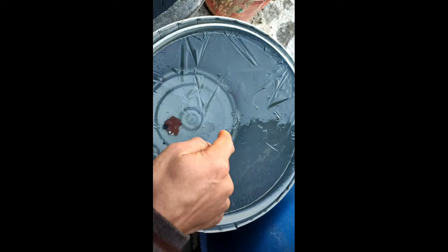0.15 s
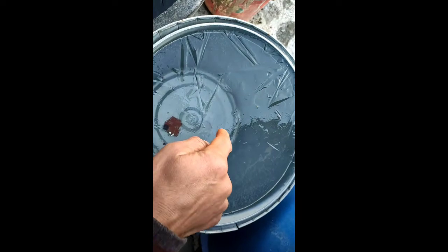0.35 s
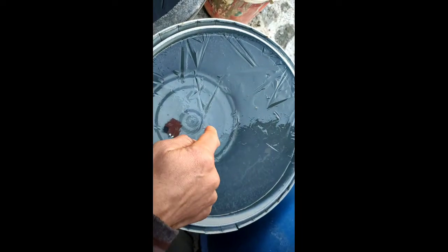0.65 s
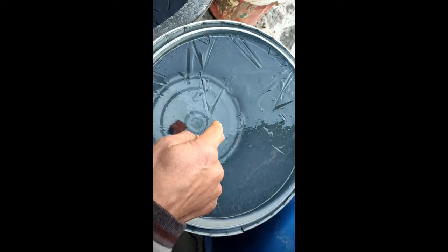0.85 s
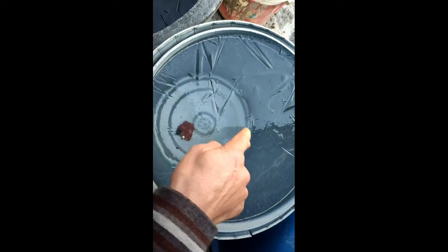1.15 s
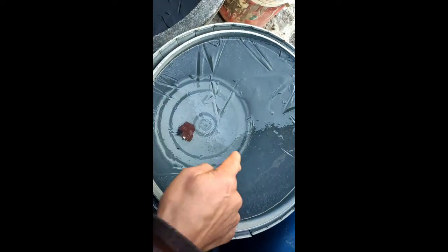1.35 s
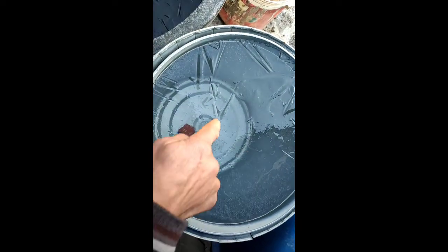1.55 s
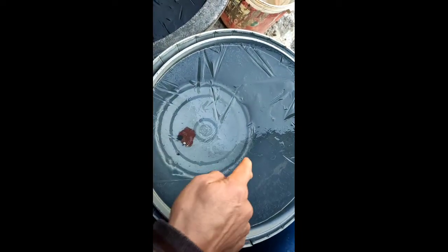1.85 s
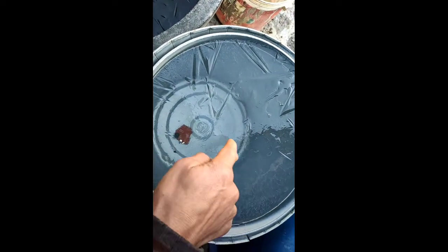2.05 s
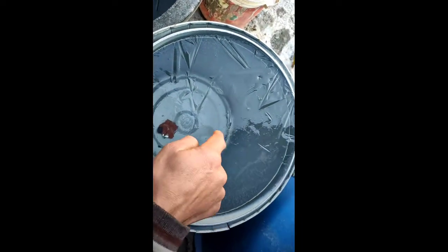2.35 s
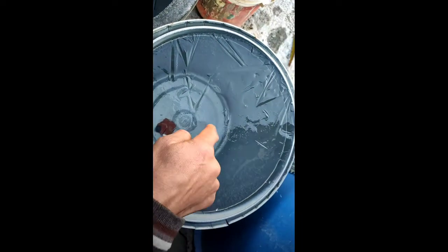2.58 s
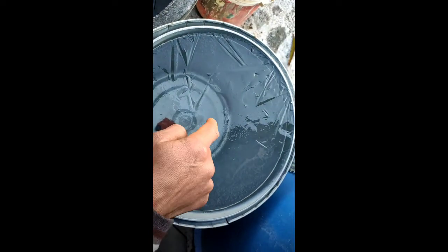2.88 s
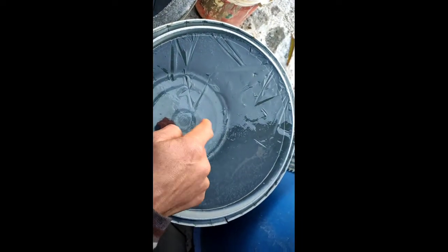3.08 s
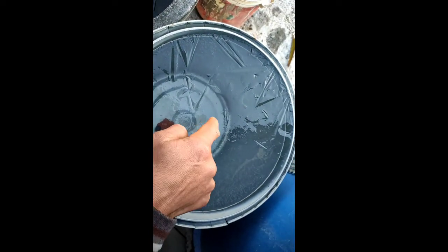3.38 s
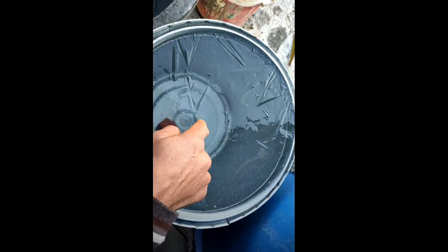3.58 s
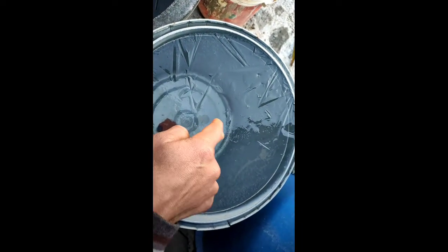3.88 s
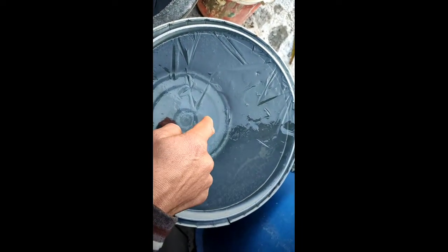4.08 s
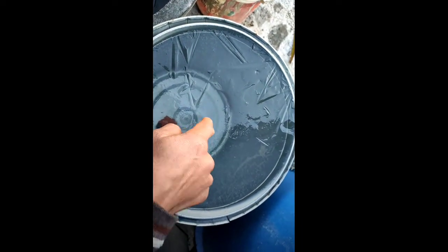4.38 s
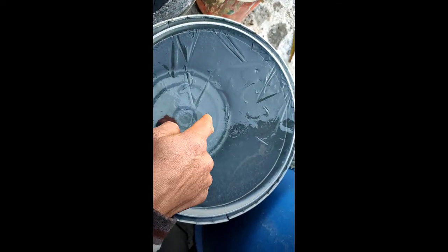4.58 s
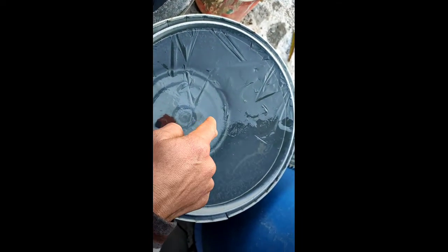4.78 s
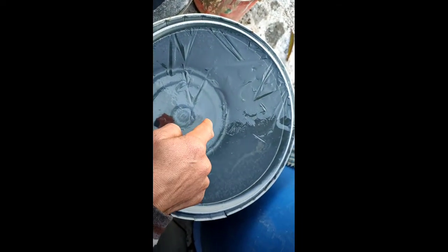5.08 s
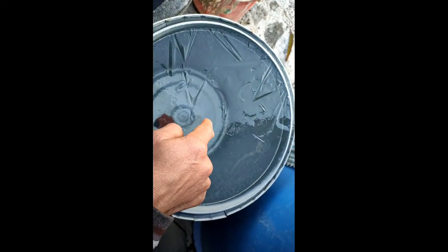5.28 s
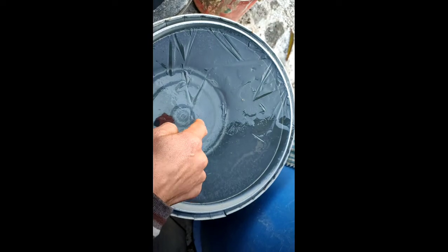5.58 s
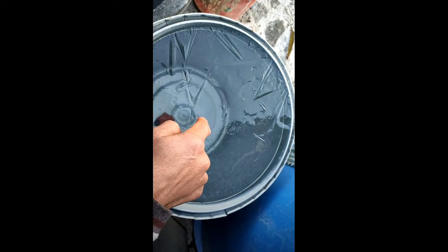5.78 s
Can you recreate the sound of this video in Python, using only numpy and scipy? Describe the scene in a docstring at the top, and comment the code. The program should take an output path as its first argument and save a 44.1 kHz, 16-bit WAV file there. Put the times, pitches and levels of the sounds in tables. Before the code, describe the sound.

A fingertip taps a thin cracked ice sheet on a bucket, crisp crunches over hollow thumps, faint bird and light wind behind.

```python
"""Outdoors, close to the microphone: a fingertip taps a thin, cracked sheet of ice on a plastic bucket of water.
Each tap is a brief crunch of filtered noise over a hollow thump, a falling wave with the bucket's ringing.
Once the finger slides out and back over the ice, a hiss and murmur of noise with small snags.
A small bird gives thin, falling calls from paired whistles; low noise makes light wind on the microphone,
and fainter noise the air and a distant wash."""
import sys
import numpy as np
from scipy import signal
from scipy.fft import rfft, irfft
from scipy.io import wavfile
from scipy.ndimage import uniform_filter1d

SR = 44100
rng = np.random.default_rng(int(sys.argv[2]) if len(sys.argv) > 2 else 0)


def waveform_to_disk(signal):
    """Save audio, clipped to [-1, 1], as 16-bit WAV at the path in sys.argv[1]."""
    frames = np.transpose(np.atleast_2d(signal))
    scaled = np.clip(frames, -1, 1) * 32767
    samples = np.round(scaled).astype(np.int16)
    wavfile.write(sys.argv[1], SR, samples)


N = 261954
TIME = np.arange(N) / SR  # s

# Left-right levels are positive toward the left; spectra give relative level per Hz.
# Finger taps: [t/s, crunch level/dB, time to crunch peak/s, thump setting/dB, hollowness of the spot/dB,
# left-right level/dB, f of the peak added to the crunch's colour/Hz]
TAPS = [(0.1712, -52.5, 0.00014, -70, -9, -1, 11200), (0.2537, -44.5, 0.00032, -35, 6.5, 6, 1220),
        (0.2591, -37.5, 0.0015, -41.5, -0.5, 0, 3270), (0.5362, -49, 0.00033, -43, 6, 0, 1260),
        (0.7501, -47, 0.00096, -35, 5, 0, 2200), (0.977, -53, 0.00098, -44.5, 4.5, -0.5, 1220),
        (1.2007, -59, 0.0018, -58, 8, 6, 1670), (2.3136, -34.5, 0.00088, -26.5, 6.5, 3.5, 1200),
        (2.5592, -17.5, 0.0031, -27, 2, -2.5, 3360), (2.8161, -40.5, 0.00063, -34, 5.5, 3, 1240),
        (3.0311, -18.5, .0016, -35.5, 1.5, 2.5, 2300), (3.295, -28.5, 0.0028, -31, 3, 1, 4040),
        (3.571, -24, 0.0014, -29.5, -1, 4.5, 3070), (3.9842, -17, 0.0047, -27.5, -0.5, 3, 1720),
        (4.4568, -23, 0.0066, -29, 2, 2, 3910), (4.931, -25.5, 0.00057, -34, 3, 4.5, 3810),
        (5.189, -42, .0008, -41, 5.5, 7, 3790), (5.1913, -34, 0.00098, -34.5, 4.5, 0, 3930),
        (5.4401, -42, .0007, -35, 5, 4, 3070), (5.639, -32.5, 0.0037, -32.5, 4, 3.5, 4050),
        (5.8724, -39.5, 0.0021, -34, 5, 0, 3240)]
# Change of colour with the spot, rows boom, knock, clack, sparkle:
# [level on a solid spot/dB, slope/dB per dB of hollowness]
TOUCH = [(-1.5, 1.35), (-1.2, 1.54), (0.5, 1.15), (-0.44, -0.12)]
# Broad colour of the ice sheet: [f/Hz, level/dB]
ICE = [(150, -27.5), (400, -11), (600, -24), (850, -22), (1400, -19), (2400, -12.5), (3600, -10),
       (6400, -2), (8000, 0.5), (11000, -4.5), (15000, -11), (16500, -9.5)]
# Resonances of the sheet: [f/Hz, width/Hz, level/dB]
ICE_MODES = [(1250, 58, 5.5), (1742, 170, 4), (2195, 94, 5.7), (3212, 430, 6.8), (3685, 350, 6.6),
             (4050, 330, 3), (5460, 260, 1.1), (5970, 110, 2.2), (8000, 130, 1.7), (8450, 200, 3),
             (9330, 120, 1)]
# Balance of the ice between the microphone ports: [f/Hz, left-right level/dB]
ICE_BALANCE = [(600, 3), (2400, -2.5), (4400, -3.5), (8100, -14.5), (11000, -16.5), (15000, -3)]
# Light taps rattle on relatively longer: [crunch level/dB, splash against crunch level/dB]
SPLASH = [(-43, -12.5), (-23, -20.5)]
# A crunch that builds slowly also dies slowly: s, and s per s of rise
CRUNCH_T60, CRUNCH_T60_PER_RISE = 0.021, 1.5

# Hollow colour of the bucket and its water: [f/Hz, level/dB]
BUCKET = [(50, -18.5), (105, -4), (145, -20), (203, -5.5), (250, -11), (295, -7.5), (370, -28), (460, -17),
          (570, -30), (760, -23.5), (1100, -36.5), (3000, -76.5)]
# Clear notes of the bucket under each thump: [f/Hz, level against the thump setting/dB, t60/s]
BUCKET_MODES = [(203.9, -14.5, 0.17), (289.2, -24, 0.22)]
BUCKET_RISE_S = 0.021
# Colour of the lingering rumble: [f/Hz, level/dB]
RUMBLE_COLOUR = [(20, -28), (44, -11), (58, 5), (72, -3.5), (100, -14), (150, -30.5), (205, -25),
                 (260, -35), (500, -55.5)]
# The rumble has RUMBLE_DB at the given thump setting, and changes about half as much as the thump
RUMBLE_DB, RUMBLE_AT_THUMP_DB, RUMBLE_DB_PER_DB = -57, -34, 0.53
RUMBLE_RISE_S, RUMBLE_T60 = 0.02, 1.7  # s

# Bird calls: [t/s, length/s, starting f midway between the whistles/Hz, fall/Hz, level before fade and trim/dB]
BIRD = [(0, .16, 6960, 317, -58), (0.766, 0.21, 7460, 1050, -60.5), (1.665, 0.11, 7530, 550, -62.5),
        (2.174, 0.21, 7120, 347, -60), (4.165, 0.12, 7570, 450, -78.5), (4.727, 0.16, 7670, 900, -61.5)]
CALL_FADE_DB = -10.5  # a call weakens toward its end

# Hiss of the outdoor air: [f/Hz, level/dB]
AIR = [(76, -31), (130, -0.5), (335, -13), (402, -8.5), (664, -14), (812, -15.5), (954, -17.5), (1520, -19),
       (1930, -18), (3010, -20), (7300, -19), (16000, -21.5)]
AIR_DB = -72.2
# Colour of the distant wash: [f/Hz, level/dB]
WASH_COLOUR = [(100, -12.5), (300, -2.5), (600, -5), (1200, -7), (2200, -11.5), (5000, -14.5), (16000, -27)]
# The wash dies down to a steady level: dB, extra dB at the start, time constant of the extra dB in s
WASH_DB, WASH_EXTRA_DB, WASH_FADE_S = -80.5, 13.5, 0.61

# Colour of the wind on the microphone: [f/Hz, level/dB]
WIND_COLOUR = [(10, -0.5), (24, 3), (40, -3), (60, -15.5), (90, -21), (130, -28.5), (200, -41.5),
               (400, -64)]
# Side the wind comes from: [t/s, left-right level/dB]
WIND_SIDE = [(0, 16.5), (1.9, 13), (2.4, 10.5), (5.94, 10)]
# Gusts, before a 1 dB trim of all wind: [t/s, level/dB]
GUSTS = [(0, -41), (.72, -41.5), (.9, -44), (1.519, -39), (1.83, -42), (2.24, -54.5), (2.969, -47),
         (4.38, -42.5), (4.54, -42.5), (5.48, -43)]
BREEZE_DB, GUST_RISE_S, GUST_FALL_S = -53.5, 0.04, 0.058  # breeze before the same trim

# Strokes of the sliding finger, out and back: [start t/s, fastest t/s, end t/s, hiss level when fastest/dB]
STROKES = [(1.181, 1.435, 1.58, -49.5), (1.58, 1.946, 2.06, -50)]
SWELL_DB, SINK_DB = 43, 20.5  # rise of the hiss as a stroke speeds up, drop as it slows
CREEP_DB, SKIN_DB = -67.5, -67  # hiss and murmur of the barely moving finger
LANDING_S = 0.006  # time to touch down or lift
# Colour of the hiss of skin on ice: [f/Hz, level/dB]
SLIDE_HISS = [(350, -57), (600, -14), (1050, -13.5), (1450, -21), (2120, -13), (2540, -12.5), (3250, -9),
              (5050, -10), (8500, -9), (16000, -24.5)]
# Colour of the skin's murmur: [f/Hz, level/dB]
SLIDE_SKIN = [(100, -29), (200, 0), (300, 4), (480, -5), (700, -12), (1200, -12.5), (2500, -23)]
# The skin grips and judders: [t/s, length/s, murmur level before a 1 dB trim/dB]
JUDDERS = [(1.232, .03, -59.5), (1.273, 0.02, -59.5), (1.655, 0.053, -59), (1.802, 0.083, -55.5),
           (1.967, 0.012, -54.5)]
JUDDER_HISS_DB = -6.5  # hiss of a judder against its murmur

# The sliding finger snags on ridges: [t/s, level/dB, left-right level/dB]
SNAGS = [(1.2831, -55, -1), (1.4072, -42, -18), (1.418, -42.5, 3), (1.4237, -49, -13), (1.446, -47, 2),
         (1.487, -47.5, 0), (1.8462, -52.5, 0)]
SNAG_RISE_S, SNAG_PEAK_HZ = 0.00054, 3290
# Colour of a hard snag: [boom/dB, knock/dB, clack/dB, sparkle/dB]
SNAG_TOUCH_DB = (16.5, 14, 9, -9.5)

# The ice ticks as the finger lets go of it: [t/s, level/dB]
RELEASES = [(2.353, -57), (3.617, -58.5), (4.0324, -43.5), (4.5047, -46), (4.969, -66.5), (5.686, -58)]
RELEASE_RISE_S, RELEASE_PEAK_HZ, RELEASE_PAN_DB = 0.00085, 3270, 5
# Colour of a release: [boom/dB, knock/dB, clack/dB, sparkle/dB]
RELEASE_TOUCH_DB = (1, 1, 1, -2)

EDGE_HZ = 15900  # upper edge of the recorder's band


def gain_of(db):
    """Amplitude factor of a level in dB."""
    return 10 ** (np.asarray(db) / 20)


def evened(x):
    """Scales to rms 1."""
    return x / np.sqrt(np.mean(x ** 2) + 1e-20)


def read(points, hz):
    """A spectrum joined by straight lines on a log-frequency axis."""
    f, value = np.transpose(points)
    return np.interp(np.log(hz + 1), np.log(f + 1), value)


def sides(balance_db):
    """Left and right gains of constant power."""
    pair = gain_of(np.array([[0.5], [-0.5]]) * balance_db)
    return pair / np.sqrt(np.mean(pair ** 2, axis=0))


def add(mix, s, sound):
    """Mixes a sound in at time s, cut off at the end of the mix."""
    part = mix[:, max(round(s * SR), 0):][:, :sound.shape[-1]]
    part += sound[..., :part.shape[-1]]


def bins(x):
    """Frequencies of the spectrum of x in Hz."""
    return np.fft.rfftfreq(x.shape[-1], 1 / SR)


def coloured(x, gain):
    """Causal (minimum-phase) filter with the given gain in every bin."""
    size = x.shape[-1]
    cepstrum = irfft(np.log(np.maximum(gain, 1e-5)), size)
    cepstrum[..., 1:size // 2] *= 2
    cepstrum[..., size // 2 + 1:] = 0
    return irfft(rfft(x) * np.exp(rfft(cepstrum)), size)


def port_noise(size, split_hz=1000):
    """Noise at two microphone ports: the same in the bass, unrelated in the treble."""
    common = rng.standard_normal(size)
    apart = rng.standard_normal((2, size))
    same = 1 / (1 + (bins(common) / split_hz) ** 2)
    return irfft(rfft(common) * np.sqrt(same) + rfft(apart) * np.sqrt(1 - same), size)


def patchy(x, depth_db, order=9, size=4):
    """Lets small patches of the spectrum swell and fade at random, then scales to rms 1."""
    z = signal.stft(x, nperseg=512)[2]
    patches = rng.standard_normal(z.shape[:0:-1])  # time by frequency
    patches = uniform_filter1d(patches, order, axis=0)
    patches = evened(uniform_filter1d(patches, size, axis=1))
    varied = signal.istft(z * gain_of(depth_db * patches.T), nperseg=512)[1]
    return evened(varied[:, :x.shape[-1]])


def hump(s, rise_s, fall_s):
    """A smooth hump of height 1 at time s."""
    return np.exp(-0.5 * ((TIME - s) / np.where(TIME < s, rise_s, fall_s)) ** 2)


def ice_gain(points, hz):
    """A broad colour with the sheet's resonances standing out of it, as each microphone port hears it."""
    peaks_db = sum(db / (1 + (2 * (hz - f) / width) ** 2) for f, width, db in ICE_MODES)
    return gain_of(read(points, hz) + peaks_db) * sides(read(ICE_BALANCE, hz))


def thump(level_db, sheet_hz=230, delay=0.0052, width=0.0024, sweep=35, heave_hz=32, heave_db=-14,
          ring_db=-14, ring_t60=0.085, ring_rise=0.005, free_db=5, trim_db=-1):
    """The sheet flexes on the water, its short waves arriving first, heaves once, and sets the bucket ringing."""
    t = np.arange(16384) / SR
    u = t - delay
    hz = sheet_hz * rng.uniform(0.94, 1.06)
    wave = np.sin(2 * np.pi * hz * u * (1 - sweep * u))
    flex = -np.exp(-0.5 * (u / width) ** 2) * wave * np.minimum(t / 0.0018, 1)
    turns = np.clip(heave_hz * u, 0, 2)
    heave = -np.sin(2 * np.pi * turns) * np.sin(np.pi * turns / 2) * np.exp(1 - turns)
    # waves come back from the wall in a quickly dying jumble
    ring_shape = (1 - np.exp(-(t / ring_rise) ** 2)) * gain_of(-60 * t / ring_t60)
    returns = port_noise(len(t), split_hz=3800) * ring_shape
    ring = coloured(returns, gain_of(read(BUCKET, bins(t))))
    ring = ring / np.sqrt(np.sum(ring ** 2) / (0.03 * SR))
    # a light touch damps the ringing less than a firm one
    freedom_db = np.interp(level_db, [-44, -32], [free_db, 0])
    body = flex + gain_of(heave_db) * heave + gain_of(ring_db + freedom_db) * ring
    return gain_of(level_db + trim_db) * body


def bucket_notes(level_db, light_db=7, light_thump_db=-41, firm_thump_db=-31):
    """Waves cross the water and set the bucket's low modes ringing, more freely after a light touch."""
    t = np.arange(16384) / SR
    notes = sum(gain_of(db - 60 * t / t60) * np.sin(2 * np.pi * hz * t) for hz, db, t60 in BUCKET_MODES)
    freedom_db = np.interp(level_db, [light_thump_db, firm_thump_db], [light_db, 0])
    return gain_of(level_db + freedom_db) * (1 - np.exp(-(t / BUCKET_RISE_S) ** 2)) * notes


def crunch(level_db, rise, touch_db, pan_db, peak_hz, fall_t60, peak_db=7.5, peak_width_hz=260,
           splash_db=-19, splash_t60=0.11, tail_db=-25, tail_t60=0.17, grain_db=2.0):
    """Tiny fractures crowd to a peak within milliseconds, then the sheet, the bucket's rim and the yard ring out."""
    t = np.arange(8192) / SR
    rise = max(rise, 1e-4)
    after = np.maximum(t - rise, 0)
    swell = np.minimum(0.11 + 1.1 * t / rise, 1)
    grains = gain_of(grain_db * evened(uniform_filter1d(rng.standard_normal(len(t)), size=18)))
    burst = evened(port_noise(len(t)) * swell * grains * gain_of(-60 * after / fall_t60))
    for db, t60 in ((splash_db, splash_t60), (tail_db, tail_t60)):
        ringing = (1 - np.exp(-after / 0.0034)) * gain_of(-60 * after / t60)
        burst = burst + gain_of(db) * evened(port_noise(len(t)) * ringing)
    # where the finger lands sets the colour, and one narrow peak is raised in each crunch
    hz = bins(t)
    boom_db, knock_db, clack_db, sparkle_db = touch_db
    place_db = read([(500, boom_db), (1000, knock_db), (2100, knock_db), (3100, clack_db),
                     (4200, clack_db), (5600, 0), (9500, sparkle_db)], hz)
    colour_db = place_db + peak_db / (1 + (2 * (hz - peak_hz) / peak_width_hz) ** 2)
    sound = coloured(burst, ice_gain(ICE, hz) * gain_of(colour_db) * sides(pan_db))
    # the level is that of the same energy held for 4.44 ms
    return gain_of(level_db) * sound / np.sqrt(np.sum(sound ** 2) / 2 / (0.0044425 * SR))


def taps(opening_db=-39):
    """Every tap gives a crunch, a thump and low notes; at the start the bucket still rings from an earlier one."""
    out = np.zeros((2, N))
    earlier = thump(opening_db) + bucket_notes(opening_db)
    add(out, 0, earlier[:, SR // 80:])
    for s, crunch_db, rise, thump_db, hollow_db, pan_db, peak_hz in TAPS:
        touch_db = [solid_db + slope * hollow_db for solid_db, slope in TOUCH]
        fall_t60 = CRUNCH_T60 + CRUNCH_T60_PER_RISE * rise
        splash_db = np.interp(crunch_db, *np.transpose(SPLASH))
        add(out, s, crunch(crunch_db, rise, touch_db, pan_db, peak_hz, fall_t60, splash_db=splash_db))
        add(out, s, thump(thump_db) + bucket_notes(thump_db))
    return out


def bird(spread_hz=330, buzz_hz=140, warble_hz=120, warbles_per_s=62, pan_db=-12, trim_db=-3):
    """The syrinx's two sides whistle apart, each with a warble and a fast, uneven buzz; calls fall and fade."""
    out = np.zeros((2, N))
    for s, length, pitch_hz, fall_hz, level_db in BIRD:
        t = np.arange(0, length, 1 / SR)
        voice = 0
        for offset_hz, voice_db in ((spread_hz, 0), (-spread_hz, -2)):
            buzz = evened(uniform_filter1d(rng.standard_normal(len(t)), size=40))
            warble = np.sin(2 * np.pi * (warbles_per_s * t + rng.random()))
            flutter = gain_of(2.8 * evened(uniform_filter1d(rng.standard_normal(len(t)), size=250)))
            hz = pitch_hz - fall_hz * t / length + offset_hz + buzz_hz * buzz + warble_hz * warble
            voice = voice + gain_of(voice_db) * flutter * np.sin(2 * np.pi * np.cumsum(hz) / SR)
        fading = gain_of(level_db + CALL_FADE_DB * (t / length) ** 2 + trim_db)
        add(out, s, sides(pan_db) * evened(voice) * fading * signal.windows.tukey(len(t), 0.12))
    return out


def air(patchy_db=1.8):
    """Faint hiss of the outdoors and a distant wash that dies down to a steady level, both of filtered noise."""
    hz = bins(TIME)
    hiss = patchy(coloured(port_noise(N, split_hz=150), gain_of(read(AIR, hz))), patchy_db)
    wash = patchy(coloured(port_noise(N, split_hz=310), gain_of(read(WASH_COLOUR, hz))), patchy_db)
    wash_db = WASH_DB + WASH_EXTRA_DB * np.exp(-TIME / WASH_FADE_S)
    return gain_of(AIR_DB) * hiss + gain_of(wash_db) * wash


def wind(trim_db=-1):
    """Low, lumpy gusts buffet the microphone over a light breeze, mostly on the left port."""
    buffeting = evened(coloured(port_noise(N, split_hz=21), gain_of(read(WIND_COLOUR, bins(TIME)))))
    lean = sides(np.interp(TIME, *np.transpose(WIND_SIDE)))
    gust_power = sum((gain_of(db) * hump(s, GUST_RISE_S, GUST_FALL_S)) ** 2 for s, db in GUSTS)
    power = gain_of(BREEZE_DB) ** 2 + gust_power
    return buffeting * lean * np.sqrt(power) * gain_of(trim_db)


def rumble(opening_db=-60):
    """The full bucket rumbles on after each tap and dies away; both ports hear it alike."""
    drone = evened(coloured(rng.standard_normal(N), gain_of(read(RUMBLE_COLOUR, bins(TIME)))))
    power = gain_of(opening_db - 60 * TIME / RUMBLE_T60) ** 2
    for s, _, _, thump_db, *_ in TAPS:
        age = np.maximum(TIME - s, 0)
        level_db = RUMBLE_DB + RUMBLE_DB_PER_DB * (thump_db - RUMBLE_AT_THUMP_DB)
        power = power + np.minimum(age / RUMBLE_RISE_S, 1) * gain_of(level_db - 60 * age / RUMBLE_T60) ** 2
    return drone * np.sqrt(power)


def slide_levels(judder_trim_db=-1):
    """Gains of hiss and murmur: the hiss follows each stroke's speed, and judders raise both."""
    touching = np.clip(np.minimum(TIME - STROKES[0][0], STROKES[-1][2] - TIME) / LANDING_S, 0, 1)
    judder = sum(gain_of(db + judder_trim_db) * hump(s, length / 2, length / 2) for s, length, db in JUDDERS)
    hiss_power = gain_of(CREEP_DB) ** 2 + (gain_of(JUDDER_HISS_DB) * judder) ** 2
    for start, fastest, end, db in STROKES:
        slower_db = np.interp(TIME, [start, fastest, end], [SWELL_DB, 0, SINK_DB])
        hiss_power += (TIME > start) * (TIME < end) * gain_of(db - slower_db) ** 2
    return touching * np.sqrt(hiss_power), touching * np.hypot(judder, gain_of(SKIN_DB))


def slide(patchy_db=3.5):
    """Skin rubs over the frosted sheet and catches on its small ridges; patches of the colour come and go."""
    hiss_gain, skin_gain = slide_levels()
    # about 700 catches a second, each dying with a time constant of 0.8 ms
    catches = (rng.random(N) < 700 / SR) * gain_of(4 * np.minimum(rng.exponential(1, N), 3))
    grit = 1 + 1.1 * evened(signal.lfilter([1], [1, -np.exp(-1 / (0.0008 * SR))], catches))
    hz = bins(TIME)
    hiss = patchy(coloured(port_noise(N) * grit, ice_gain(SLIDE_HISS, hz)), patchy_db)
    skin = patchy(coloured(port_noise(N), gain_of(read(SLIDE_SKIN, hz))), patchy_db)
    return hiss * hiss_gain + skin * skin_gain


def snags():
    """Ridges flick the sliding finger: short crunches without a thump, the harder the duller."""
    out = np.zeros((2, N))
    for s, db, pan_db in SNAGS:
        touch_db = np.array(SNAG_TOUCH_DB) * np.interp(db, [-56, -46], [0.3, 1])
        add(out, s, crunch(db, SNAG_RISE_S, touch_db, pan_db, SNAG_PEAK_HZ, fall_t60=0.028))
    return out


def releases():
    """The sheet springs back with a faint tick, a small crunch without a thump."""
    out = np.zeros((2, N))
    for s, db in RELEASES:
        tick = crunch(db, RELEASE_RISE_S, RELEASE_TOUCH_DB, RELEASE_PAN_DB, RELEASE_PEAK_HZ, fall_t60=0.043)
        add(out, s, tick)
    return out


def scene():
    """Sums the finger on the ice, the bird, the air, the wind and the bucket's rumble."""
    return taps() + releases() + slide() + snags() + bird() + air() + wind() + rumble()


def record(dry):
    """A soft start over 4 ms, then the recorder's band limit as a low-pass filter."""
    faded = dry * np.minimum(TIME / 0.004, 1)
    low_pass = signal.firwin(255, EDGE_HZ, window=("kaiser", 9), fs=SR)
    return signal.oaconvolve(faded, low_pass[None], "same")


dry = scene()
out = record(dry)
waveform_to_disk(out)
```